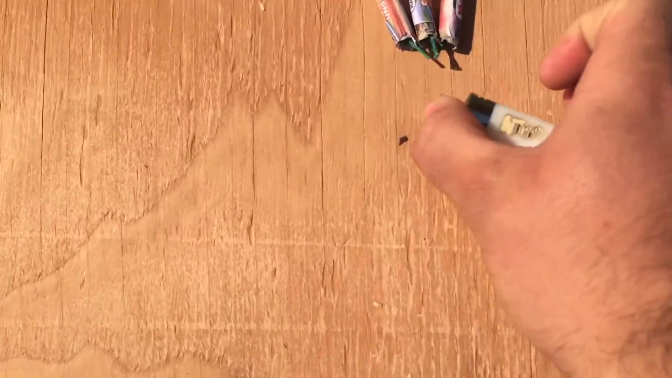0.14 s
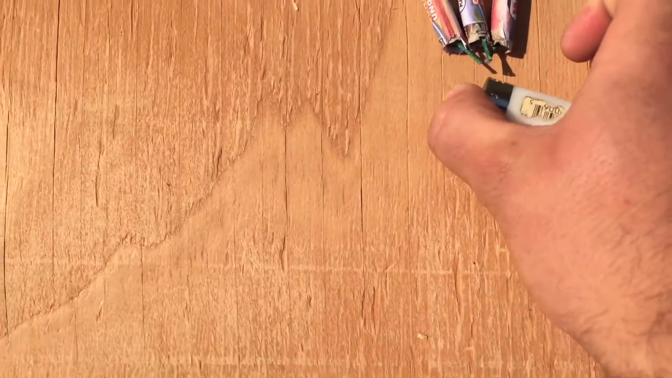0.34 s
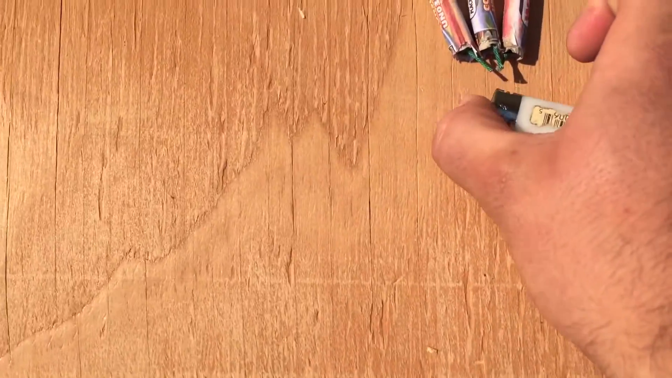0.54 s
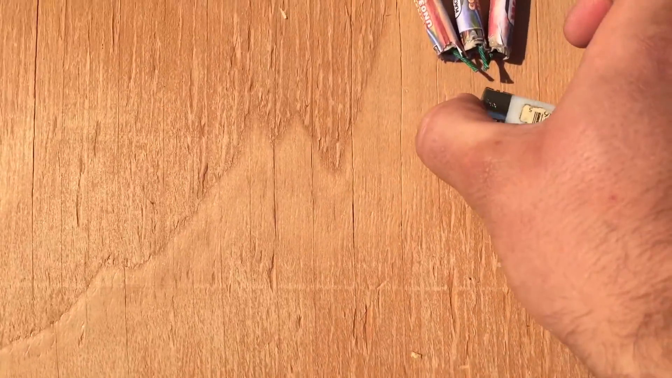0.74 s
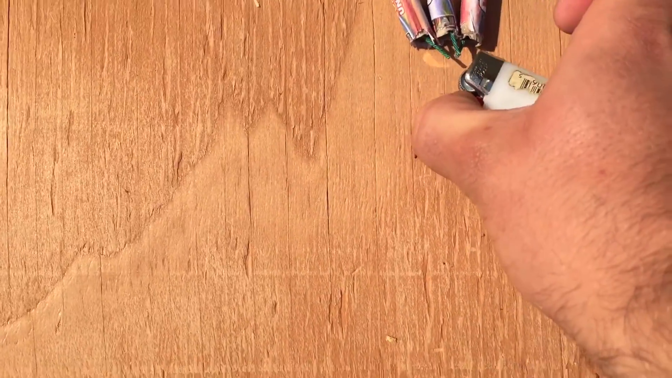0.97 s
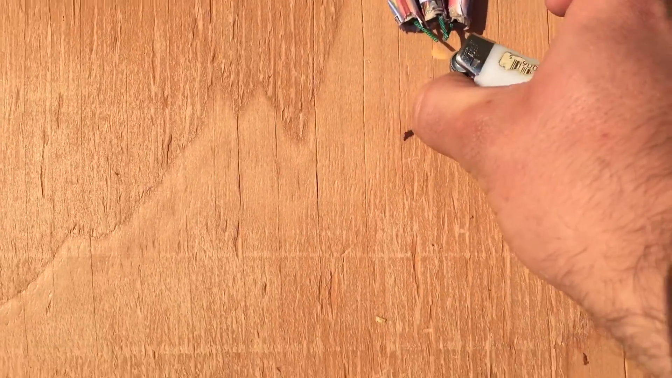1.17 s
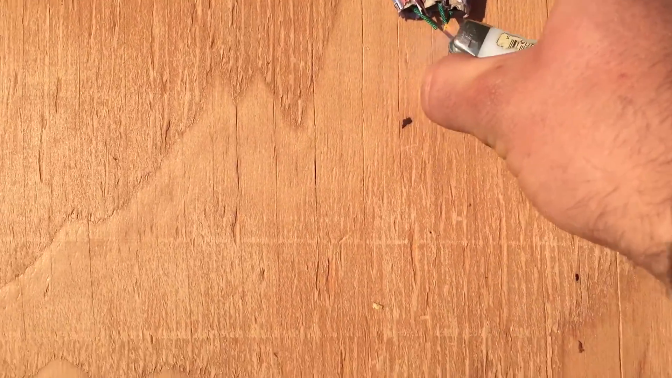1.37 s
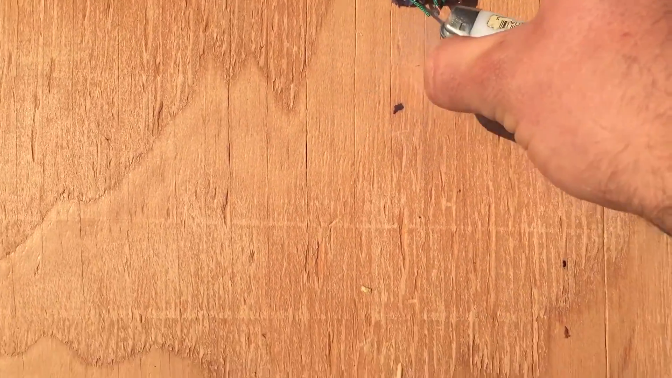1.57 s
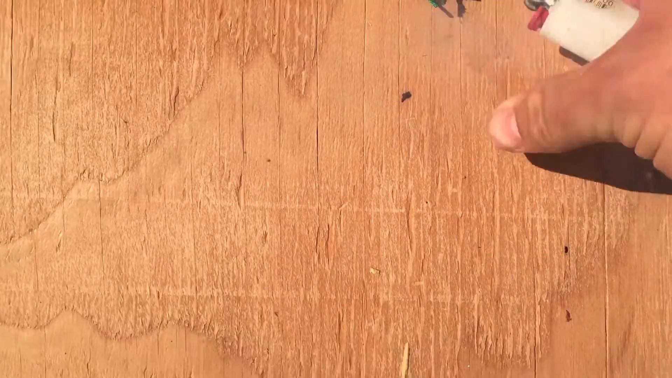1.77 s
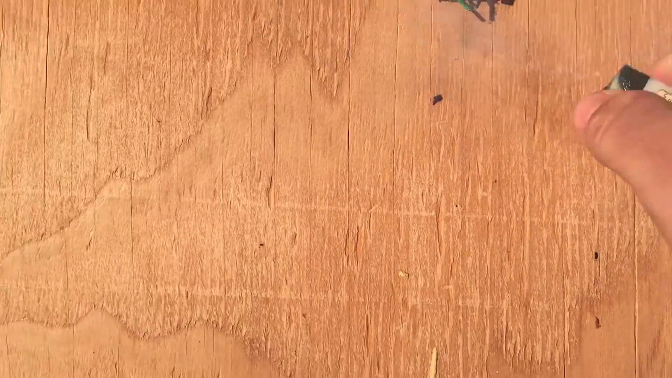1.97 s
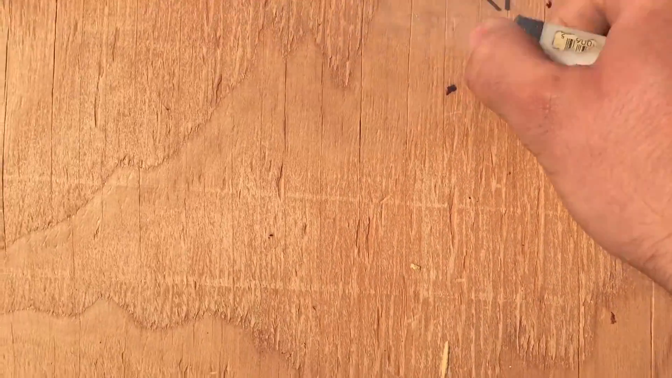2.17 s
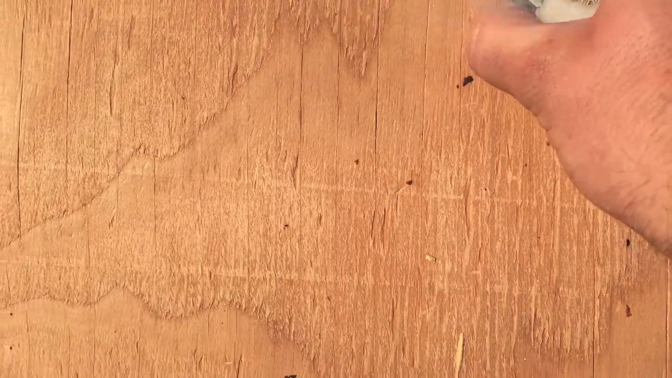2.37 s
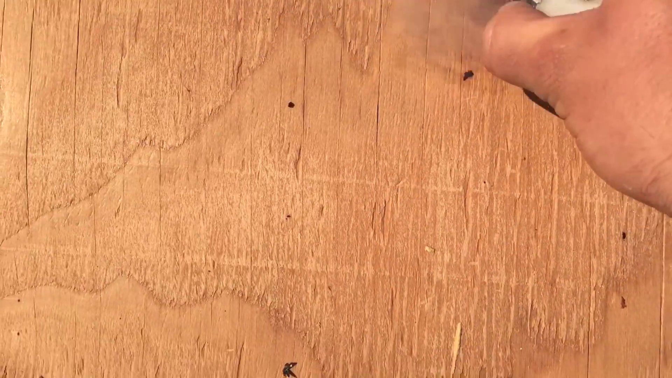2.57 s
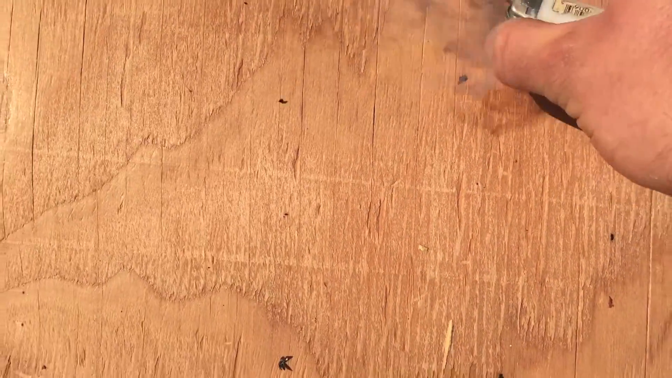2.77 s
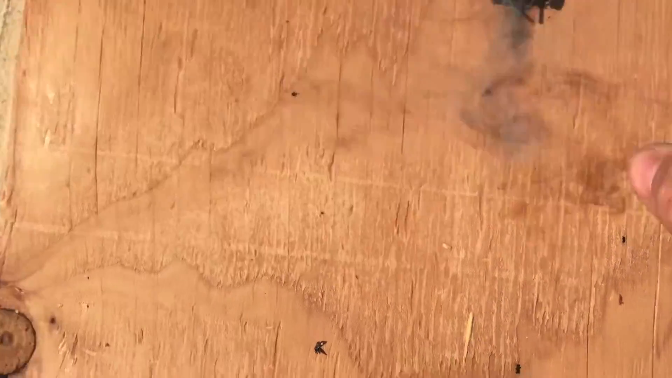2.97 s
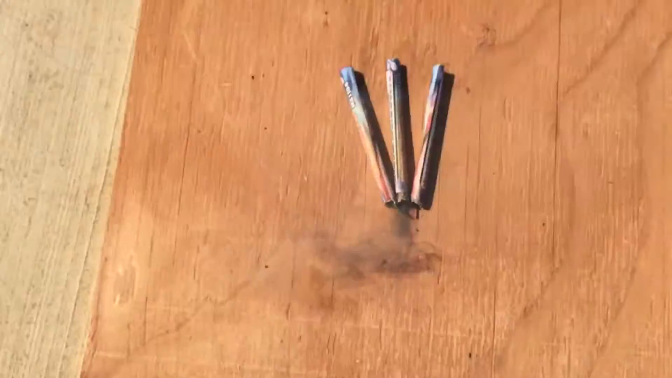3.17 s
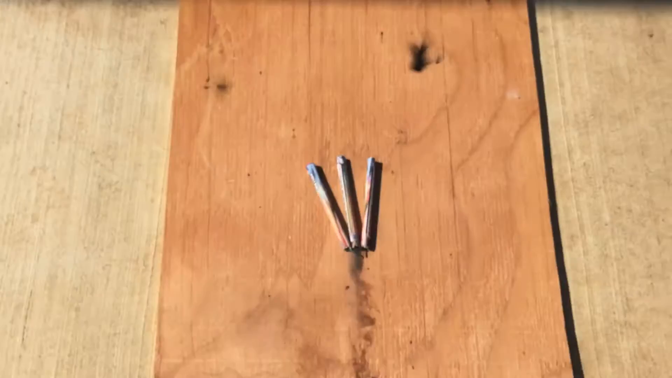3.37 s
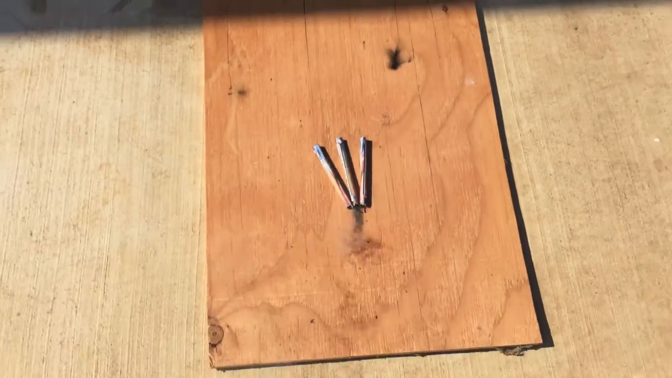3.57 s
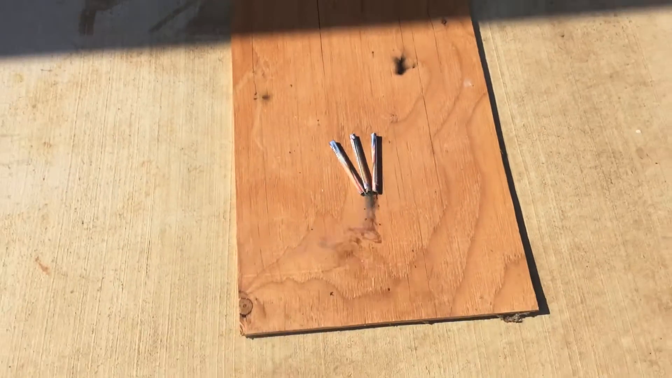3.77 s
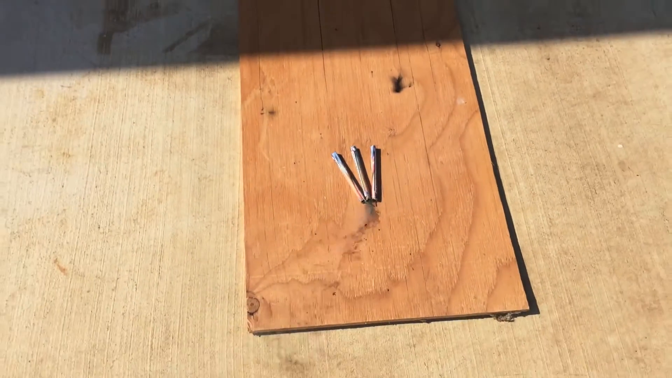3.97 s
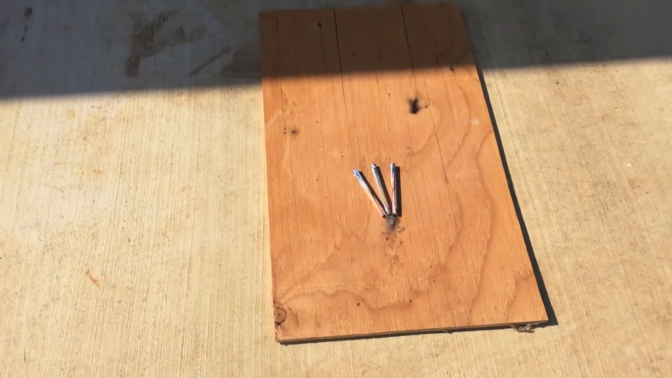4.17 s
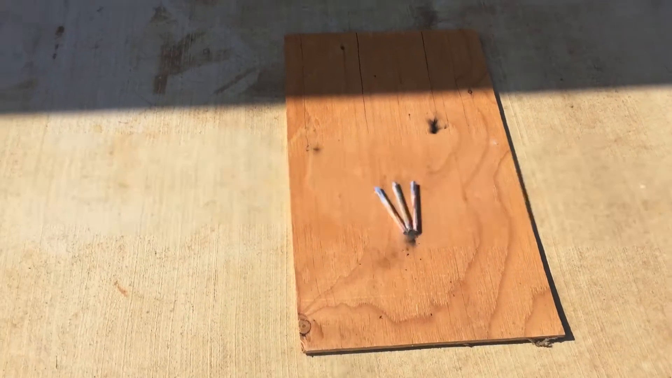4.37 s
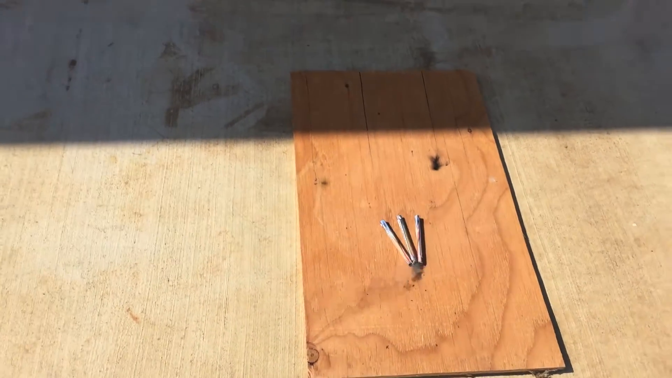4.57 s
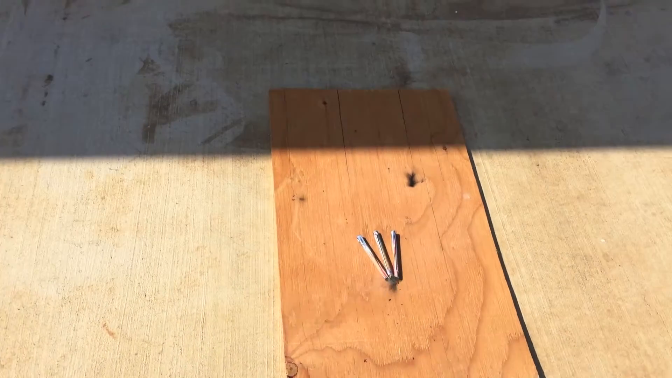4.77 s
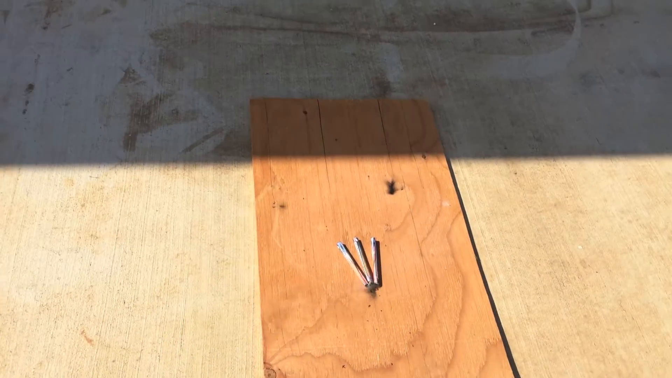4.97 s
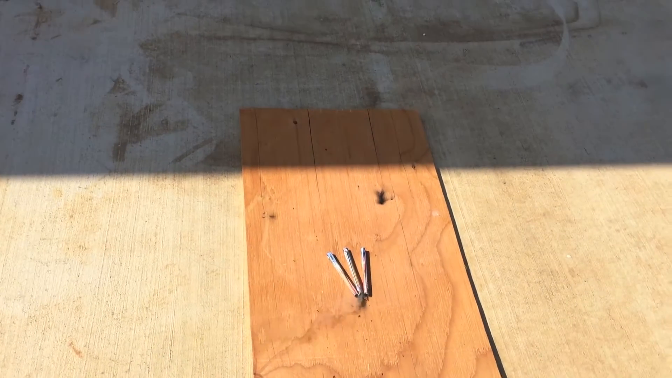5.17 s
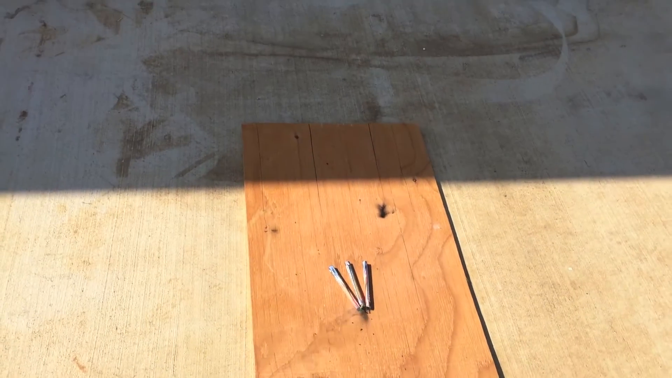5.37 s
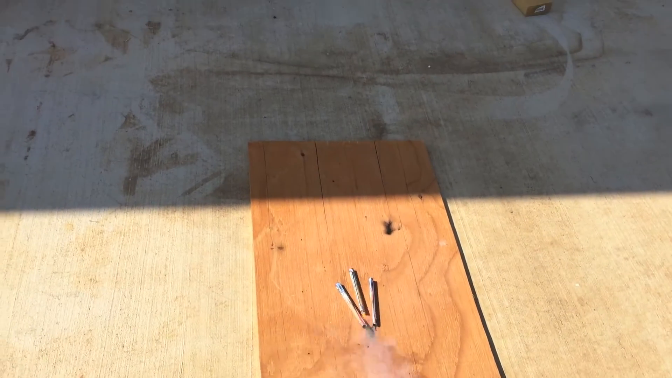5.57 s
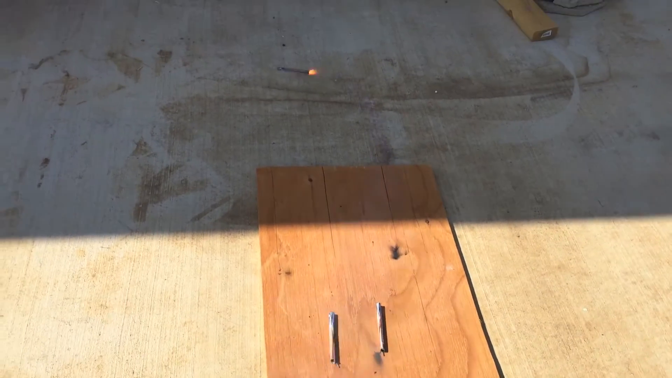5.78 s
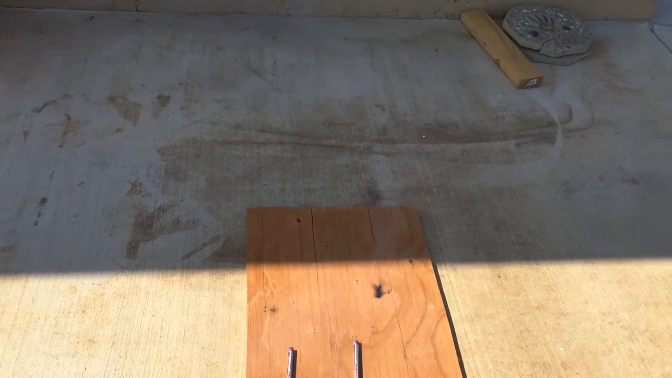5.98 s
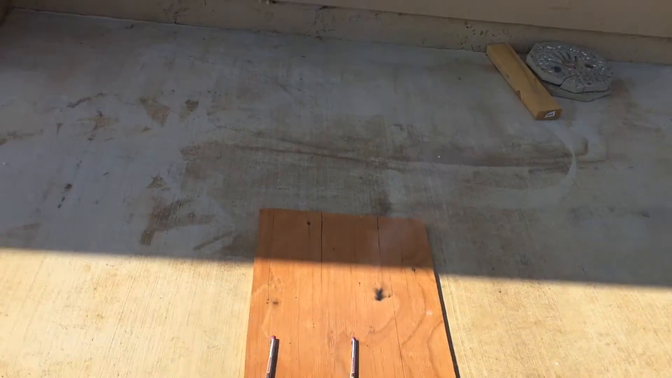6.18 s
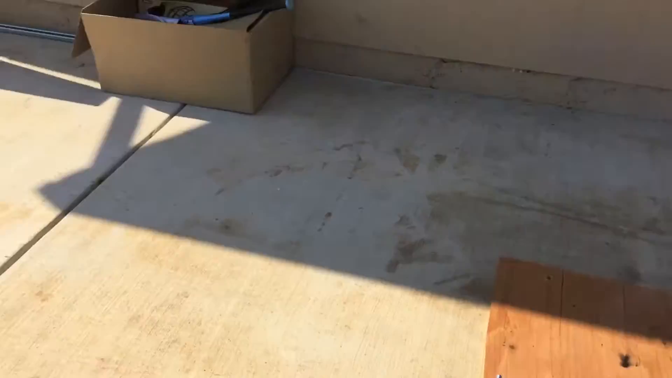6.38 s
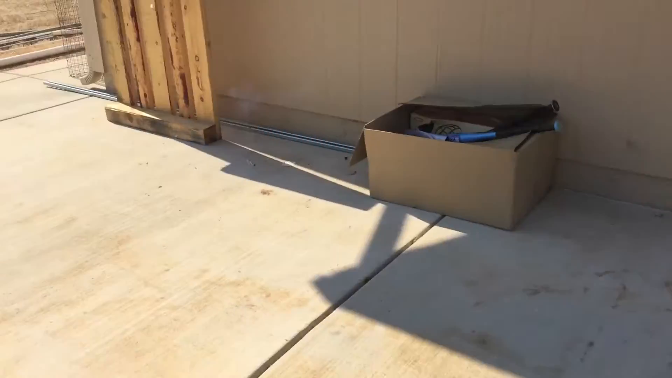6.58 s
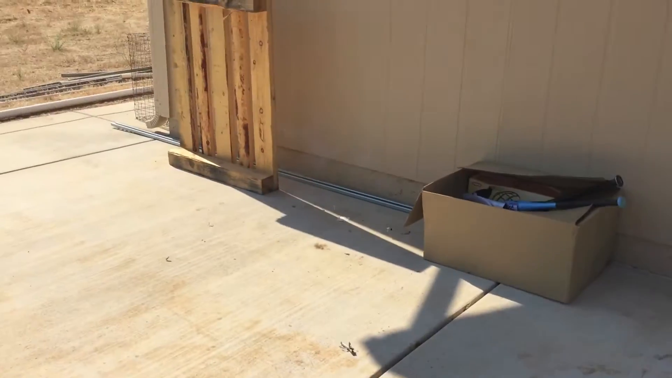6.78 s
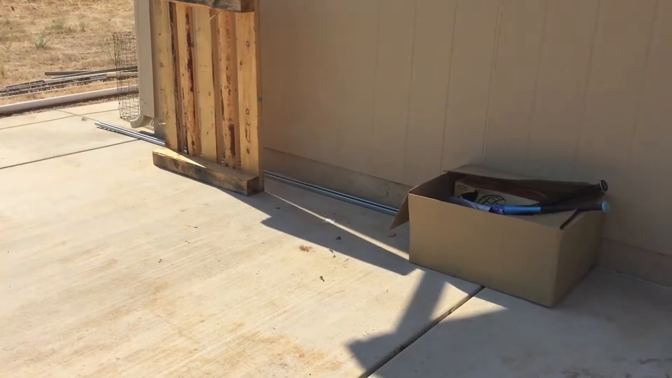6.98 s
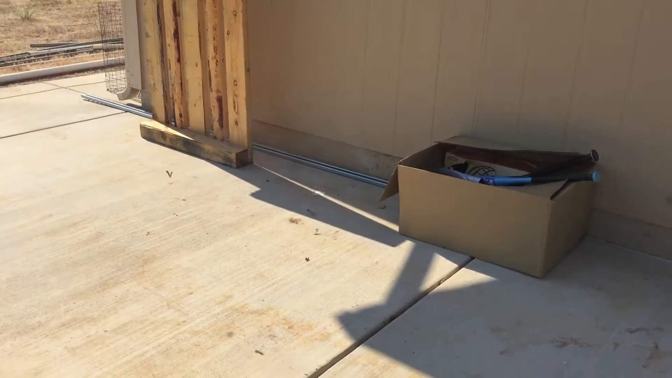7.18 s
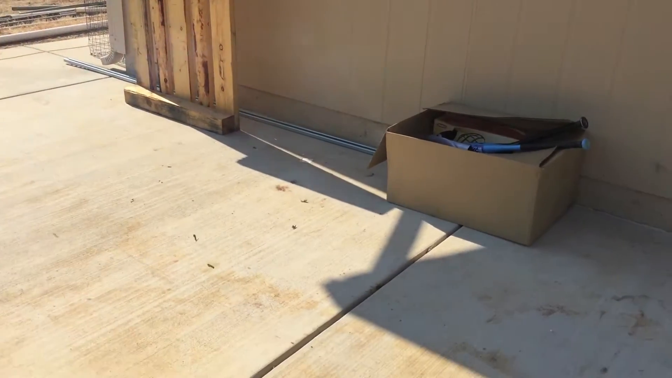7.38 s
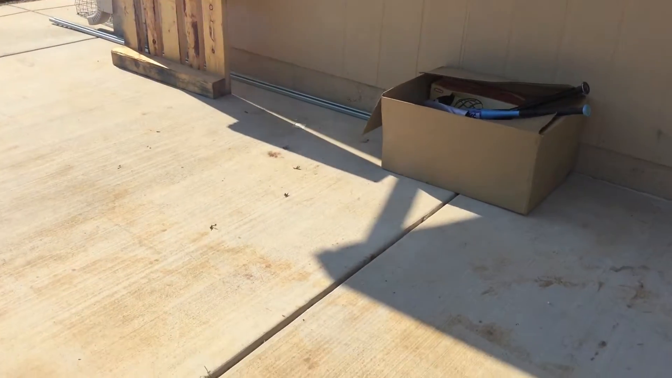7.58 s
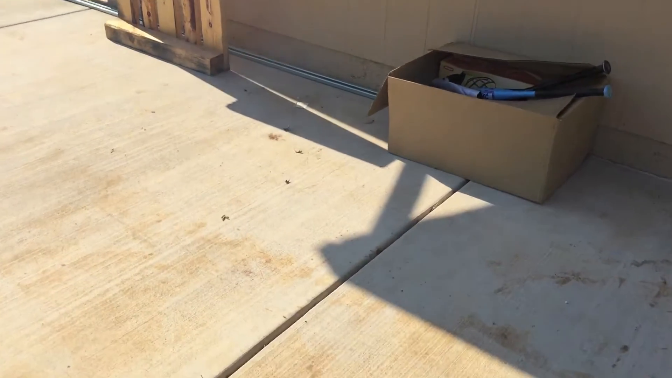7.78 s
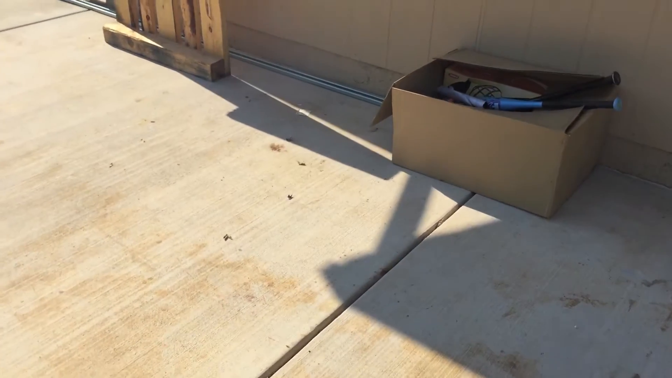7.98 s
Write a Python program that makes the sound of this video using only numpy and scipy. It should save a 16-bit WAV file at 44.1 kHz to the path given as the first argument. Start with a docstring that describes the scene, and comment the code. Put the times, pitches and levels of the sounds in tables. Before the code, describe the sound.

Outdoors on a concrete patio, light breeze and brief low gusts brush the microphone, with faint scuffs. At 0.9 s a lighter gives a loud, crisp snap and its gas flame flares softly and flutters. Small handling ticks come near 1.1 s. At 1.4 s the fuse catches with a rough, airy roar; a second, slightly softer click with a metallic ping lands at 2.4 s. The burn becomes a brighter sizzling hiss around 3 s, spits at 3.35 s, and thins as the microphone retreats, with a dull knock at 3.6 s and scuffs later. At 5.6 s a puff bursts into a piercing, very loud whistle, falling slightly, then edging up, beating and roughening as it flies off until 6.1 s. Near silence follows, then a tiny swelling hiss and one sharp, overloaded bang at 6.62 s. Muffled echoes return until 8 s, amid breeze and faint ticks.

```python
"""A whistling rocket takes off from a plywood board on a concrete patio, near the microphone, in a light breeze.
Its tube sounds a piercing tone that falls, then edges up, and beats against its own ground reflection.
Before that a lighter clicks, its gas flame flutters, and the fuse catches and hisses; a second click follows.
Tones make the whistle; shaped noise makes the flame, fuse jet, exhaust, wind and handling sounds.
After a short swelling hiss the rocket bursts with one sharp bang, and echoes return from the neighbourhood."""
import sys
import numpy as np
from scipy import signal
from scipy.fft import rfft, irfft, next_fast_len
from scipy.io import wavfile
from scipy.ndimage import uniform_filter1d, map_coordinates

SR = 44100
rng = np.random.default_rng(int(sys.argv[2]) if len(sys.argv) > 2 else 0)


def generate_wav(signal):
    """Clip the signal to [-1, 1] and save it as 16-bit WAV at the path in sys.argv[1]."""
    frames = np.transpose(np.atleast_2d(signal))
    scaled = np.clip(frames, -1, 1) * 32767
    pcm = np.round(scaled).astype(np.int16)
    wavfile.write(sys.argv[1], SR, pcm)


N = 354311
T = np.arange(N) / SR   # seconds

# Spectra of the noises, before each is scaled to unit power. Each row: frequency in Hz, relative dB per Hz.
BREEZE_COLOUR = [(13, -46.5), (22, -23.5), (54, 1.5), (97, 1), (118, -1), (227, -12.5), (367, -31.5),
                 (400, -33.5), (420, -30.5), (550, -62.5), (920, -120)]
AIR_COLOUR = [(200, 7), (500, -1), (1000, -1), (2000, -5), (3000, -10.5), (6000, -18.5), (15000, -20)]
STRIKE_COLOUR = [(150, -5), (880, -3.5), (1900, -8.5), (2800, -17.5), (3460, -0.5), (4200, -13.5),
                 (5700, 2.5), (6700, 1.5), (7500, -10.5), (8900, -4.5), (10500, -7.5), (14600, 0),
                 (15800, -14.5)]
FLAME_COLOUR = [(120, -34.5), (200, 0), (1170, -15), (1560, -17.5), (1850, -43.5), (2130, -16), (2750, -44),
                (3380, -40.5), (12000, -44.5), (15600, -78.5), (22000, -120)]
ROAR_COLOUR = [(200, -10), (600, -7.5), (1150, -1), (1700, -3), (1920, -8), (2250, 3.5), (2950, -12),
               (3400, -9), (4200, -15), (4700, -17.5), (6100, -14.5), (7500, -21.5), (9300, -11.5),
               (10600, -23.5), (15000, -11)]
HISS_COLOUR = [(900, -13.5), (1700, 0.5), (1920, -0.5), (2200, 4), (2700, 4), (3000, 2), (3450, 7),
               (4200, -3.5), (5500, -6.5), (7000, -8.5)]
SIZZLE_COLOUR = [(4500, -31), (6200, -9.5), (7500, -4.5), (9600, 3), (10600, -6.5), (12000, -0.5),
                 (13200, -10.5), (14900, -7), (16000, 7.5)]
EXHAUST_COLOUR = [(150, 2), (500, -7), (1200, -2.5), (2200, 3.5), (3200, -5), (5000, -5.5), (9000, -1.5),
                  (15500, -10)]
BANG_COLOUR = [(45, -15.5), (110, -0.5), (175, -16), (245, -1.5), (400, -7.5), (680, -3), (850, -6),
               (1400, -4.5), (2000, -6), (2800, -9), (5500, -11.5), (9000, -16.5), (15000, -24.5)]
ECHO_COLOUR = [(120, -3), (300, -8), (650, -13), (1300, 3.5), (2100, 0), (2900, -5.5), (4500, -5.5),
               (8000, -14.5), (15000, -20)]

# Outdoor background, low from the whistle to the bang. Each row: time in seconds, level in dB.
BACKGROUND = [(0, -65), (5.6, -65), (6.15, -77), (6.55, -77.5), (7.0, -69.5)]
# Breeze between gusts. Each row: time in seconds, level in dB.
BREEZE = [(0, -55), (.9, -52), (2.2, -53), (3.3, -54.5), (5.6, -53), (5.9, -63), (6.38, -80), (6.52, -58),
          (6.9, -56), (7.15, -65.5), (7.72, -54), (8.03, -65)]
# Gusts that buffet the microphone. Each row: peak in seconds, level in dB, half length in seconds.
GUSTS = [(0.14, -40, 0.015), (0.23, -36, 0.034), (0.537, -38, 0.023), (0.815, -43.5, 0.03), (.96, -44, .05),
         (1.095, -41.5, 0.033), (1.355, -42, 0.016), (1.682, -48.5, 0.026), (3.147, -43, 0.024),
         (4.71, -47, .02), (4.94, -44.5, .016), (7.914, -35, 0.018)]

# Light ticks of handling and of falling scraps.
# Each row: peak in seconds, level in dB, centre in Hz, t60 in seconds.
TICKS = [(1.089, -44.5, 800, .024), (1.141, -47, 1300, .014), (6.977, -54.5, 3980, .12),
         (7.548, -56.5, 7980, .04), (7.688, -67, 8040, .042)]
TICK_OCTAVES, TICK_RISE_S = 0.75, 0.0005
# Soft scuffs of hand and shoes.
# Each row: peak in seconds, level in dB, centre in Hz, width in octaves, t60 in seconds.
SCUFFS = [(.27, -65, 7000, 3.4, 0.5), (.53, -60, 880, .5, .2), (.6, -68, 2200, 1.5, .06),
          (.85, -62, 1200, 1.1, .14), (1.105, -55, 1290, 1, 0.084), (1.182, -55, 1300, 0.92, 0.084),
          (4.15, -53, 680, 0.26, 0.13), (4.79, -51.5, 696, .56, .22), (7.96, -60, 600, .5, .077)]
SCUFF_RISE_SHARE = 0.11   # rise time over t60
# What one dull knock while stepping back rings with. Each row: centre in Hz, level in dB, t60 in seconds.
KNOCK_MODES = [(342, -32, .022), (600, -37, .06), (760, -26, .016), (1350, -31, 0.018)]
KNOCK_S, KNOCK_OCTAVES, KNOCK_RISE_S = 3.625, .62, .0005

# Lighter strikes. Each row: peak in seconds, snap level in dB, snap t60 in seconds, metal ping level in dB.
STRIKES = [(0.9179, -9, 0.0066, -29.5), (2.379, -17.5, 0.016, -18)]
PING_HZ, PING_OCTAVES, PING_T60_S = 8680, .13, .022
# the flame flares at the first strike, then burns low until the fuse catches
FLARE_DB, FLARE_T60_S, FLAME_DB = -43.5, 0.56, -61.5

# Burning fuse. Each row: time in seconds, then open flame roar, jet hiss and sizzle, each in dB.
FUSE = [(1.42, -37, -47, -52), (1.6, -38.5, -55, -43.5), (1.92, -40, -55, -65), (2.48, -39, -42.5, -41),
        (2.57, -48, -44.5, -41), (2.8, -47, -41.5, -36), (3.05, -51, -41, -38), (3.4, -54, -48, -46),
        (4.15, -66, -49.5, -54), (4.78, -57, -50, -51), (5.5, -63.5, -53, -52.5)]
FUSE_LIT_S, LAUNCH_S = 1.419, 5.592
# Pitch cancelled by the board's reflection, which climbs as the flame creeps into the tube.
# Each row: time in seconds, notch in Hz, reflection strength from 0 to 1.
NOTCH = [(1.75, 2600, 0.27), (2.5, 3670, 0.54), (2.98, 3770, 0.96), (3.5, 4730, 0.64), (4.1, 7370, 0.7),
         (4.5, 12700, 0.7), (4.95, 13100, 0.06)]
# Spits and puffs of powder.
# Each row: peak in seconds, level in dB, centre in Hz, width in octaves, t60 in seconds.
SPITS = [(2.444, -31, 1380, 1.37, .095), (3.344, -34, 1700, 0.67, .025), (3.362, -36.5, 1480, .9, .08),
         (3.401, -26, 2900, 1.8, .0086), (5.604, -32, 1000, .4, .03), (5.605, -22, 1970, .17, 0.032),
         (5.622, -22, 3560, 1.5, .045)]
SPIT_RISE_SHARE = 0.065   # rise time over t60: longer puffs also swell more slowly

# Exhaust: a puff at ignition, then a rush that follows the whistle's level by this share of its dB.
IGNITION_DB, IGNITION_T60_S, EXHAUST_DB, EXHAUST_FOLLOWS = -30.5, .07, -31.5, .8
BACKWASH_S, BACKWASH_DB = 5.79, -31
# Whistle pitch, about which it wavers. Each row: time in seconds, pitch in Hz.
PITCH = [(5.612, 3930), (5.63, 3822), (5.665, 3800), (5.695, 3590), (5.708, 3605), (5.735, 3526),
         (5.78, 3475), (5.865, 3365), (5.93, 3443), (6.04, 3476), (6.09, 3550)]
# Whistle strength as the rocket turns and flies off.
# Each row: time in seconds, fundamental in dB, even overtones in dB relative to it.
WHISTLE = [(5.62, -5, -24), (5.725, -4.5, -22), (5.77, -9, -10.5), (5.81, -13.5, -7), (5.835, -21.5, -8.5),
           (5.89, -22, -8), (5.935, -16, -17), (5.975, -22, -10), (6.005, -18.5, -10.5), (6.07, -21.5, -18)]
WHISTLE_ON_S, WHISTLE_RISE_S, WHISTLE_OFF_S, WHISTLE_T60_S = 5.62, .0025, 6.078, .075
# third partial relative to the fundamental when that is at 0 dB; it weakens further with the tone
THIRD_DB, THIRD_FOLLOWS = -14, .33
# Doppler gap between the direct and the reflected whistle. Each row: time in seconds, gap in Hz.
DOPPLER_GAP = [(5.61, 41.6), (5.74, 49), (5.865, 167.5), (5.9, 95.2), (5.94, 59.7), (6.09, 52.4)]
# the fundamental's ground reflection grows to this strength by the time the rocket is far off
REFLECTION, FAR_S = .66, 5.92
# the burn turns rough as the charge runs out: roughness 0-1 before and at its worst
SMOOTH, ROUGHEST, ROUGH_AT_S, ROUGH_FOR_S = .12, .8, 5.99, .08   # the last is a half length
# hiss before the bang: its broad part and a band within it
SWELL_RISE_S, SWELL_DB, SWELL_BAND_DB, SWELL_BAND_HZ = .062, -45, -49.5, 2482

BANG_S = 6.6245
# The blast and its returns from ground and house. Each row: delay in seconds, level in dB, t60 in seconds.
BLAST = [(0, -3, 0.066), (.008, -7, .06), (0.0131, 0.5, .055), (0.033, -17.5, 0.099)]
# Far echoes of the bang.
# Each row: peak in seconds, level in dB, rise in seconds, t60 in seconds, frequency in Hz above which it is dull.
ECHOES = [(6.66, -44.5, 0.011, 0.75, 8940), (6.757, -43, 0.0017, 0.17, 4000),
          (6.88, -53.5, .02, 0.92, 1810), (7.15, -47.5, 0.015, .8, 5910), (7.2, -52.5, 0.022, 2.5, 2207),
          (7.56, -52.5, 0.028, 0.43, 3450), (7.619, -48.5, 0.063, 0.31, 2200), (7.84, -59, .04, 0.61, 2190)]
CUTOFF_HZ = 15350   # top of the microphone's range


def from_db(db):
    """Decibels to gain."""
    return 10 ** (np.asarray(db) / 20)


def rms_one(x):
    """Scale to unit power."""
    return x / np.sqrt(np.mean(x ** 2) + 1e-20)


def in_time(rows):
    """The columns of a curve, at every sample."""
    s, *columns = np.transpose(rows)
    return [np.interp(T, s, column) for column in columns]


def shaped_noise(gain_at, size=N):
    """Unit noise whose gain is a function of frequency."""
    padded = next_fast_len(size)
    hz = np.maximum(np.fft.rfftfreq(padded, 1 / SR), 1)
    spectrum = rfft(rng.standard_normal(padded)) * gain_at(hz)
    return rms_one(irfft(spectrum, padded)[:size])


def noise(colour):
    """Unit noise with the given spectrum, falling steeply beyond its ends."""
    points_hz, db = np.transpose(colour)

    def gain_at(hz):
        skirts = np.minimum(1, np.minimum(hz / points_hz[0], points_hz[-1] / hz)) ** 4
        return from_db(np.interp(np.log(hz), np.log(points_hz), db)) * skirts

    return shaped_noise(gain_at)


def band(centre_hz, octaves, size=N):
    """Unit noise round one broad resonance."""
    return shaped_noise(lambda hz: 1 / (1 + (np.log2(hz / centre_hz) / octaves) ** 4), size=size)


def drift(rate_hz):
    """Smooth random wandering of spread 1."""
    return shaped_noise(lambda hz: 1 / (1 + (hz / rate_hz) ** 4))


def low_pass(x, hz, order=2):
    """Dull the sound above a frequency."""
    return signal.sosfilt(signal.butter(order, min(hz, SR / 2 - 1000), fs=SR, output="sos"), x)


def delayed(x, seconds):
    """The sound as it arrives over a longer path."""
    return map_coordinates(x, [(T - seconds) * SR], order=3)


def burst(age, rise, t60):
    """Envelope that swells to 1 at age zero and then dies away by 60 dB in t60 seconds."""
    log_level = np.where(age < 0, age / abs(rise), -np.log(1000) * age / abs(t60))
    return np.exp(np.maximum(log_level, -40))


def held(on_s, off_s, rise, t60):
    """Envelope that swells to 1, holds, and then dies away."""
    return burst(T - np.clip(T, on_s, off_s), rise, t60)


def hump(s, half_length_s):
    """Smooth swell to 1 and back."""
    return np.exp(-np.minimum(((T - s) / half_length_s) ** 2, 40))


def tap(s, db, centre_hz, octaves, rise, t60):
    """A short damped noise round one resonance, kept within a quarter second of its peak."""
    out, near = np.zeros(N), np.abs(T - s) < .25
    resonance = band(centre_hz, octaves, size=int(near.sum()))
    out[near] = from_db(db) * burst(T[near] - s, rise, t60) * resonance
    return out


def outdoors(swing_db=2.5, lumpy_db=2.0):
    """A lumpy breeze with a few gusts on the microphone, over a faint background."""
    breeze = from_db(in_time(BREEZE)[0] + swing_db * drift(7))
    gust_power = sum((from_db(db) * hump(s, half_length)) ** 2 for s, db, half_length in GUSTS)
    strength = np.sqrt(breeze ** 2 + gust_power)
    wind = strength * rms_one(noise(BREEZE_COLOUR) * from_db(lumpy_db * drift(14)))
    return wind + from_db(in_time(BACKGROUND)[0]) * noise(AIR_COLOUR)


def small_noises():
    """Ticks, scuffs and one knock near the microphone, each a damped band of noise."""
    ticks = sum(tap(s, db, hz, TICK_OCTAVES, TICK_RISE_S, t60) for s, db, hz, t60 in TICKS)
    scuffs = sum(tap(s, db, hz, octaves, SCUFF_RISE_SHARE * t60, t60) for s, db, hz, octaves, t60 in SCUFFS)
    knock = sum(tap(KNOCK_S, db, hz, KNOCK_OCTAVES, KNOCK_RISE_S, t60) for hz, db, t60 in KNOCK_MODES)
    return ticks + scuffs + knock


def lighter(rise_s=0.0013, ring_db=-23, ring_t60=0.098, flutter_db=2.0, spit_db=9):
    """The igniter snaps, case and board ring briefly, and the gas flame flares, flutters and spits."""
    snaps = 0
    for s, db, t60, _ in STRIKES:
        ring = from_db(ring_db) * burst(T - s, rise_s, ring_t60)
        snaps = snaps + from_db(db) * (burst(T - s, rise_s, t60) + ring)
    pings = sum(tap(s, ping_db, PING_HZ, PING_OCTAVES, rise_s, PING_T60_S) for s, _, _, ping_db in STRIKES)

    spits_per_s, spit_s = 45, .0018
    starts = (rng.random(N) < spits_per_s / SR) + 1e-18
    spits = signal.lfilter([1], [1, -np.exp(-1 / (spit_s * SR))], starts)   # each start decays over spit_s
    lit_s = STRIKES[0][0] + .012
    flare = from_db(FLARE_DB) * burst(T - lit_s, .003, FLARE_T60_S)
    low_flame = from_db(FLAME_DB) * held(lit_s, FUSE_LIT_S, .003, .15)
    flicker = from_db(flutter_db * drift(35)) * rms_one(1 + from_db(spit_db) * spits)
    flame = np.hypot(flare, low_flame) * flicker * noise(FLAME_COLOUR)
    return snaps * noise(STRIKE_COLOUR) + pings + flame


def fuse(sputter_db=0.88, grains_per_s=600, grain_db=-14, near_s=0.001145, far_s=0.003):
    """Powder burns with an open roar, then as a small jet; both are combed by reflections from board and ground."""
    roar_db, hiss_db, sizzle_db = in_time(FUSE)
    notch_hz, strength = in_time(NOTCH)
    grains = (rng.random(N) < grains_per_s / SR) * rng.standard_normal(N)
    crackle = from_db(grain_db) * rms_one(grains - low_pass(grains, 4000, order=1))
    layers = [(noise(ROAR_COLOUR), roar_db), (noise(HISS_COLOUR), hiss_db),
              (noise(SIZZLE_COLOUR) + crackle, sizzle_db)]
    out = 0
    for jet, level_db in layers:
        combed = jet + np.clip(strength, 0, 1) * delayed(jet, .5 / notch_hz)   # half a cycle late cancels
        running_power = uniform_filter1d(combed ** 2, size=4000)   # evens out the level over 0.09 s
        out = out + from_db(level_db) * combed / np.sqrt(running_power + 1e-9)
    # a second, weaker reflection comes later as the microphone backs away
    out = out + 0.091 * delayed(out, np.interp(T, [2.9, 4.2], [near_s, far_s]))
    burning = np.clip((T - FUSE_LIT_S) / 0.01, 0, 1) * np.clip((LAUNCH_S + 0.024 - T) / .02, 0, 1)
    return out * burning * from_db(sputter_db * drift(26))


def powder_spits():
    """Lumps of powder catch all at once, each a short puff of banded noise."""
    return sum(tap(s, db, hz, octaves, SPIT_RISE_SHARE * t60, t60) for s, db, hz, octaves, t60 in SPITS)


def exhaust(rise_s=.0008, t60=0.18, flutter_db=.5, backwash_hz=50, backwash_octaves=1.2,
            backwash_rise_s=.16, backwash_t60=.14):
    """Gas puffs at ignition and rushes along with the whistle; its backwash rumbles on the microphone."""
    level_db, _ = in_time(WHISTLE)
    puff = from_db(IGNITION_DB) * held(LAUNCH_S + .002, WHISTLE_ON_S - .008, rise_s, IGNITION_T60_S)
    rush_level = from_db(EXHAUST_DB + EXHAUST_FOLLOWS * level_db)
    rush = rush_level * held(WHISTLE_ON_S, WHISTLE_OFF_S - .012, rise_s, t60)
    gas = np.hypot(puff, rush) * from_db(flutter_db * drift(80)) * noise(EXHAUST_COLOUR)
    build_up = burst(T - BACKWASH_S, backwash_rise_s, backwash_t60)
    rumble = build_up * held(WHISTLE_ON_S, WHISTLE_OFF_S, .01, t60)
    return gas + from_db(BACKWASH_DB) * rumble * band(backwash_hz, backwash_octaves)


def whistle(distance, shimmer_db=3.0, fourth_db=-3, reflection_growth=1.7):
    """The burning charge drives the tube's quarter-wave tone, which falls, then edges up, as it flies off."""
    jitter_radians, jitter_rate_hz, waver_hz, scatter_radians = .55, 260, 11, .6
    pitch_hz, = in_time(PITCH)
    level_db, even_db = in_time(WHISTLE)
    gap_hz, = in_time(DOPPLER_GAP)
    roughness = SMOOTH + (ROUGHEST - SMOOTH) * hump(ROUGH_AT_S, ROUGH_FOR_S)
    tube = 2 * np.pi * np.cumsum(pitch_hz + waver_hz * drift(70)) / SR
    direct = tube + jitter_radians * roughness * drift(jitter_rate_hz)   # uneven burning shakes the cycles
    # the reflected path has another Doppler shift and wanders over uneven ground, so the two beat irregularly
    mirrored = tube + 2 * np.pi * np.cumsum(gap_hz * (T > LAUNCH_S)) / SR
    wander = jitter_radians * drift(jitter_rate_hz) + scatter_radians * drift(50)
    mirrored = mirrored + roughness * wander
    partials_db = [0, even_db, THIRD_DB + THIRD_FOLLOWS * level_db, even_db + fourth_db]
    out = 0
    for k, partial_db in enumerate(partials_db, 1):
        share = REFLECTION * distance ** reflection_growth / np.sqrt(k)   # rough ground scatters the overtones
        # overtones die first
        sounding = held(WHISTLE_ON_S, WHISTLE_OFF_S, WHISTLE_RISE_S, WHISTLE_T60_S / k)
        pair = (np.sin(k * direct) + share * np.sin(k * mirrored)) / np.sqrt((1 + share ** 2) / 2)
        out = out + sounding * from_db(partial_db) * pair
    return out * from_db(level_db + shimmer_db * roughness * drift(150))


def yard(x, wet_db, t60, dull_hz):
    """Faint scatter from walls and fences: the sound smeared by a decaying, dulled noise."""
    scatter = low_pass(rng.standard_normal(N), dull_hz) * burst(T - .04, .01, t60)
    scatter = scatter / np.sqrt(np.sum(scatter ** 2))
    return from_db(wet_db) * signal.fftconvolve(x, scatter)[:N]


def swell(band_octaves=.35, t60=.04):
    """A faint hiss grows until the rocket bursts, then dies away."""
    broad = from_db(SWELL_DB) * burst(T - BANG_S, SWELL_RISE_S, t60) * noise(EXHAUST_COLOUR)
    band_level = from_db(SWELL_BAND_DB) * burst(T - BANG_S, 1.5 * SWELL_RISE_S, t60)
    return broad + band_level * band(SWELL_BAND_HZ, band_octaves)


def rocket():
    """Exhaust, whistle and swell; the farther the rocket, the more of its whistle comes back from the yard."""
    distance = np.clip((T - LAUNCH_S) / (FAR_S - LAUNCH_S), 0, 1)   # 0 on the board, 1 far off
    tone = whistle(distance)
    return tone + exhaust() + swell() + yard(tone * distance ** 4, wet_db=-41, t60=2.2, dull_hz=6000)


def bang(dull_hz=3000, treble_t60=0.16, suction=0.12, thump_db=-31, thump_t60=0.2,
         slap_delay_s=.1325, slap_db=-40, slap_hz=180):
    """The charge bursts with a crack that loses its top quickly; echoes roll back from ever farther away."""
    suction_s = .0022
    crack = noise(BANG_COLOUR)
    body = low_pass(crack, dull_hz, order=1)
    treble = (crack - body) * burst(T - BANG_S, .01, treble_t60)
    blast_power = sum((from_db(db) * burst(T - BANG_S - lag, 0.00036, t60)) ** 2 for lag, db, t60 in BLAST)
    near = np.sqrt(blast_power) * (body + treble)
    near = near - suction * delayed(low_pass(near, 2300), suction_s)   # each push is followed by a duller pull
    thump_noise = noise([(70, 0), (160, -0.5), (260, 2.0)])   # rows as in the spectra above
    thump = from_db(thump_db) * burst(T - BANG_S - .01, 0.0057, thump_t60) * thump_noise
    # the thump returns from a wall
    slap = tap(BANG_S + slap_delay_s, slap_db, slap_hz, octaves=0.81, rise=0.0038, t60=0.054)
    roll = noise(ECHO_COLOUR)
    far = 0
    for s, db, rise, t60, hz in ECHOES:
        echo = rms_one(low_pass(np.roll(roll, rng.integers(N)), hz))   # a random stretch of the same noise
        far = far + from_db(db) * burst(T - s, rise, t60) * echo
    return near + thump + slap + far


def scene():
    """Everything at one microphone."""
    mix = outdoors() + small_noises() + lighter() + fuse() + powder_spits() + rocket() + bang()
    return mix[None]


def record(dry):
    """Whistle and bang overload the microphone, which rounds off their peaks; the top is cut."""
    ceiling = .78
    clipped = dry / (1 + (dry / ceiling) ** 12) ** (1 / 12)
    return signal.sosfilt(signal.ellip(12, .1, 90, CUTOFF_HZ, fs=SR, output="sos"), clipped)


dry = scene()
out = record(dry)
generate_wav(out)
```